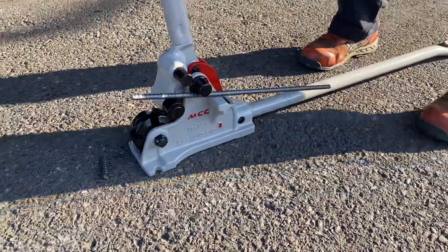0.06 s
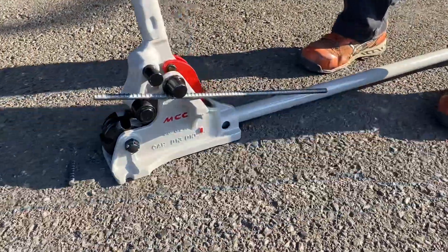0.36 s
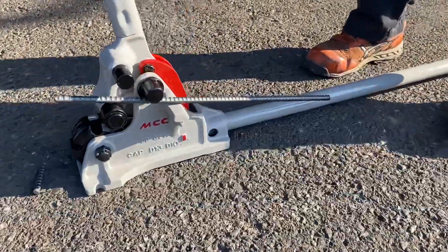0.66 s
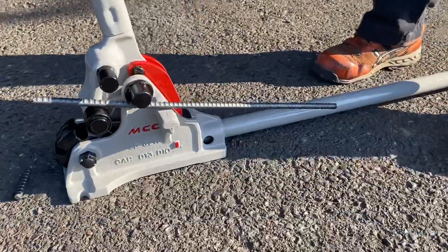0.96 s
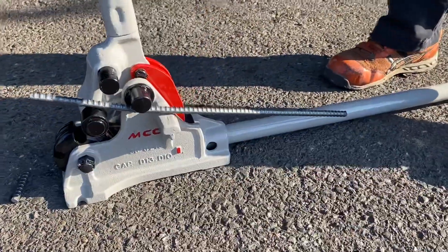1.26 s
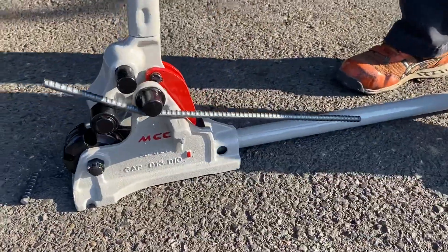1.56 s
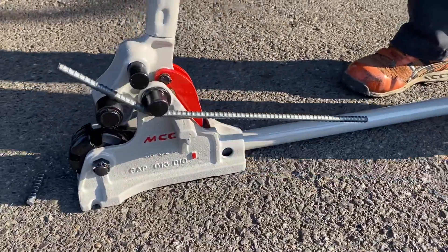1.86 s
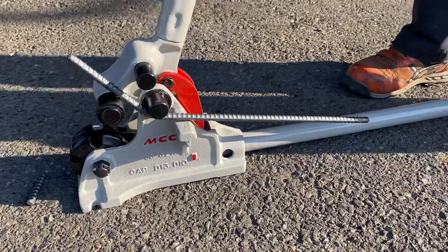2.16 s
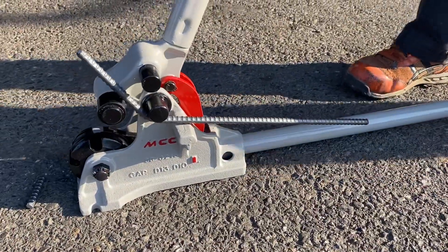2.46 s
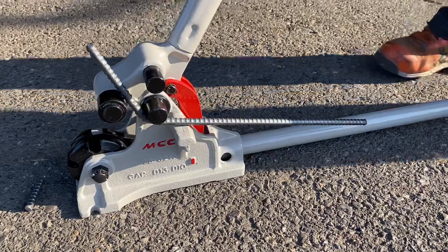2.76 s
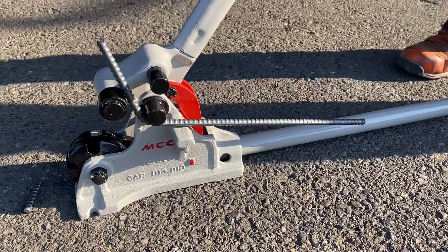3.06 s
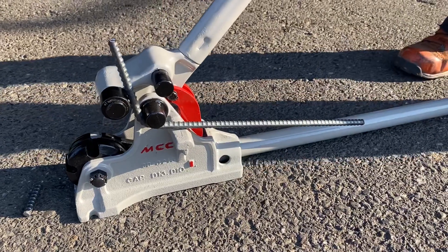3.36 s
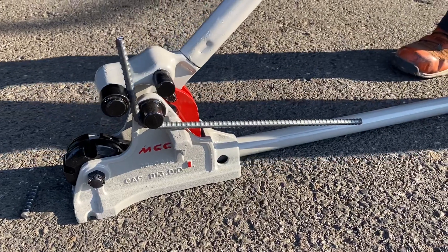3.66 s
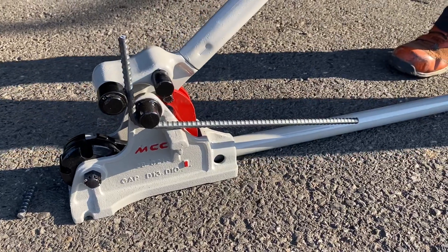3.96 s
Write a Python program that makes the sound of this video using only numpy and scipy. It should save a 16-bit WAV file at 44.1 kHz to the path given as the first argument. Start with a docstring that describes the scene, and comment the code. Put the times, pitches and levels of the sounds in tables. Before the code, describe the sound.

A steel rebar scrapes and knocks into a hand bender right at the start. At about 2 seconds it slips with a sharp double click and rings faintly, followed by two small clicks near 2.6 and 2.8 seconds. Grit ticks lightly on the asphalt. Wind rumbles on the microphone throughout, gusting around 1, 2.3 and 3.6 seconds, over faint hiss and steady distant traffic.

```python
"""An asphalt yard, outdoors, where a hand bender bends a steel rebar in front of a stereo microphone.
The bar scrapes and knocks into its seat, then slips under load with a sharp double click and rings on
faintly. Grit cracks under the tool and shoes; ground and walls give back a thin echo.
Wind buffets the microphone over a faint hiss and the steady wash of distant traffic."""
import sys
import numpy as np
from scipy import signal
from scipy.fft import rfft, irfft
from scipy.io import wavfile
from scipy.ndimage import uniform_filter1d

SR = 44100
rng = np.random.default_rng(int(sys.argv[2]) if len(sys.argv) > 2 else 0)


def file_out(sig):
    """Save sig as 16-bit WAV at sys.argv[1]."""
    # one column per channel
    cols = np.atleast_2d(sig).T
    # limit, then scale
    lim = np.clip(cols, -1, 1)
    pcm = np.round(lim * 32767).astype(np.int16)
    wavfile.write(sys.argv[1], SR, pcm)


N = 176400
TIME = np.arange(N) / SR
RING_RISE_S = 0.00093


def amp(db):
    """Decibels to gain."""
    return 10 ** (np.asarray(db) / 20)


def unit(x):
    """Scales to rms 1."""
    return x / np.sqrt(np.mean(x ** 2) + 1e-20)


def read(points, hz):
    """Reads a spectrum on a log-frequency axis."""
    f, value = np.transpose(points)
    return np.interp(np.log(hz + 1), np.log(f + 1), value)


def curve(points):
    """Reads a time curve at every sample."""
    return np.interp(TIME, *np.transpose(points))


def pan(db):
    """Channel gains that put left db above right."""
    return amp(np.array([[.5], [-.5]]) * db)


def add(mix, start_s, sound):
    """Mixes a sound in at a time."""
    part = mix[:, max(round(start_s * SR), 0):][:, :sound.shape[-1]]
    part += sound[..., :part.shape[1]]


def pulse(spectrum, size=1024):
    """A minimum-phase click of energy 1 with the given colour."""
    log_gain = np.log(amp(read(spectrum, abs(np.fft.fftfreq(size, 1 / SR)))))
    click = np.fft.ifft(np.exp(np.conj(signal.hilbert(log_gain)))).real[:size // 2]
    return click / np.linalg.norm(click)


def colour(x, spectrum):
    """Filters both channels with the given colour."""
    return signal.oaconvolve(x, pulse(spectrum)[None], axes=1)[:, :x.shape[1]]


def noise(spectrum, likeness, balance):
    """Stereo noise of rms 1; colour, left-right likeness and balance in dB each vary with Hz."""
    hz = np.fft.rfftfreq(N, 1 / SR)
    left, other = rfft(rng.standard_normal((2, N)))
    shared = np.clip(read(likeness, hz), -1, 1)
    right = shared * left + np.sqrt(1 - shared ** 2) * other
    return unit(irfft(np.array([left, right]) * amp(read(spectrum, hz)) * pan(read(balance, hz)), N))


def waver(db, seconds):
    """A gain that wanders at random."""
    size = int(seconds * SR)
    drift = uniform_filter1d(uniform_filter1d(rng.standard_normal(N), size), size // 2)
    return amp(db * unit(drift))


def impulses(size, per_s, spread_db):
    """Impulses at random times, a few stronger than the rest."""
    hits = rng.random(size) < per_s / SR
    return hits * amp(spread_db * np.minimum(rng.exponential(1, size), 4))


def moving_air(x, depth_db=2, band_hz=60, patch_s=.12):
    """Moving air makes narrow bands of distant sound swell and fade."""
    frame, hop = 2048, 512
    bands = signal.stft(x, nperseg=frame, noverlap=frame - hop)[2]
    patches = rng.standard_normal(bands.shape[1:])
    patches = uniform_filter1d(patches, round(band_hz * frame / SR), axis=0)
    patches = uniform_filter1d(patches, round(patch_s * SR / hop), axis=1)
    bands *= amp(depth_db * unit(patches))
    return unit(signal.istft(bands, nperseg=frame, noverlap=frame - hop)[1][:, :N])


def traffic():
    """Far-off traffic reaches the microphone as a wide, steady wash."""
    # Colour of the wash. Each row: frequency in Hz, relative density in dB.
    spectrum = [(25, -26), (65, -1.5), (250, -1.5), (400, -2), (700, -2), (950, -2), (1500, -10),
                (2200, -17.5), (3000, -29), (4500, -41), (7500, -48), (8600, -90.5), (9700, -92.5),
                (10600, -51), (13600, -51.5), (15000, -74.5)]
    # Stereo width. Each row: frequency in Hz, left-right correlation.
    likeness = [(60, 0.98), (250, 0.44), (500, 0.066), (900, -0.06), (1500, -0.29), (2500, 0.48),
                (5000, 0.41), (12000, 0.26)]
    # Lean to the right. Each row: frequency in Hz, left minus right in dB.
    balance = [(100, -1), (500, -4.5), (1000, -0.5), (3000, -0.5), (12000, -4)]
    # Slow drift. Each row: time in seconds, relative level in dB.
    level = [(0, -36), (.3, -36), (1.0, -36.5), (1.6, -36), (2.2, -36.5), (2.7, -36), (3.2, -36),
             (3.5, -37.5), (4, -38)]
    return moving_air(noise(spectrum, likeness, balance)) * amp(curve(level) + 5)


def hiss():
    """A faint, flickering hiss, strongest at the start."""
    # Colour of the hiss. Each row: frequency in Hz, relative density in dB.
    spectrum = [(1000, -23), (2500, 11.5), (4500, 10.5), (6000, 4.5), (7300, 3.5), (8000, 0), (8700, -37),
                (9600, -32.5), (10600, -0.5), (13600, -0.5), (14600, -22), (16000, -42)]
    # Its rise and fall. Each row: time in seconds, level in dB.
    level = [(0, -53.5), (.2, -53), (.33, -54.5), (.45, -62), (.62, -65), (.9, -65), (1.08, -61.5),
             (1.3, -60.5), (1.55, -58.5), (1.73, -57.5), (1.85, -62.5), (2.1, -63), (2.5, -61), (2.65, -59),
             (3.05, -64), (3.25, -60), (3.7, -61), (3.85, -57.5), (4, -62)]
    treble = noise(spectrum, likeness=[(3000, 0.21), (12000, 0.14)], balance=[(3000, -1), (12000, 0)])
    return treble * amp(curve(level)) * waver(db=1.1, seconds=0.015)


def eddies(spectrum, likeness, balance_db, steady_s):
    """Turbulence at the microphone's two ports, its strength held even over steady_s."""
    turbulence = noise(spectrum, [(100, likeness)], [(100, balance_db)])
    size = int(steady_s * SR)
    power = uniform_filter1d(uniform_filter1d((turbulence ** 2).mean(0), size), size)
    return turbulence / np.sqrt(power + 1e-9)


def wind():
    """Wind right on the microphone: a lumpy rumble and a higher flutter; short buffets swell both."""
    # Colours of the two layers. Each row: frequency in Hz, relative density in dB.
    rumble_spectrum = [(15, -43.5), (30, -20.5), (45, 0.5), (67, 6), (90, 2), (130, -6), (220, -25.5),
                       (500, -52.5), (3000, -110)]
    flutter_spectrum = [(50, -37.5), (120, 2), (190, -1), (260, 1), (335, -11), (500, -14), (700, -42),
                        (2000, -55), (8000, -100)]
    # The breeze in each layer. Each row: time in seconds, relative level in dB.
    rumble_level = [(0, -36.5), (.1, -38), (.2, -44), (.33, -31), (.6, -35), (.7, -35.5), (.92, -32.5),
                    (1.2, -31.5), (1.7, -34.5), (2.0, -34), (2.25, -29), (2.6, -26.5), (2.82, -33.5),
                    (2.95, -55), (3.15, -54), (3.42, -31), (3.69, -37.5), (3.82, -42.5), (3.92, -34.5),
                    (4, -43)]
    flutter_level = [(0, -35.5), (.3, -33.5), (.58, -34.5), (.68, -34), (.82, -29), (.9, -35.5), (1.0, -37),
                     (1.15, -39.5), (2.1, -40), (2.27, -28.5), (2.5, -30), (2.8, -41.5), (3.1, -41.5),
                     (3.33, -37), (3.5, -33), (3.75, -28), (3.87, -39.5), (4, -37)]
    # Single buffets. Each row: start and length in seconds, rumble and flutter peaks in relative dB.
    buffets = [(0.27, 0.042, -20, -40), (0.498, 0.037, -30, -31), (0.549, 0.017, -29, -21.5),
               (0.562, 0.048, -28, -36), (0.938, 0.08, -31, -25), (1.013, 0.038, -17.5, -27),
               (1.075, 0.039, -16, -45), (2.287, 0.048, -16, -23.5), (2.327, 0.06, -19.5, -14.5),
               (2.402, 0.025, -21, -22), (2.449, 0.027, -24, -20.5), (3.519, 0.042, -40, -20.5),
               (3.626, 0.064, -25, -23), (3.709, 0.026, -25, -26)]
    rumble_gain, flutter_gain = amp(curve(rumble_level)), amp(curve(flutter_level))
    flutter_gain *= flutter_gain / np.hypot(flutter_gain, amp(-38.5))  # lulls sink further
    for start, length, rumble_db, flutter_db in buffets:
        swell = np.sin(np.pi * np.clip((TIME - start) / length, 0, 1) ** 0.93)
        rumble_gain = np.hypot(rumble_gain, amp(rumble_db) * swell)
        flutter_gain = np.hypot(flutter_gain, amp(flutter_db) * swell)
    rumble = eddies(rumble_spectrum, likeness=0.71, balance_db=0, steady_s=0.034)
    lumps = waver(db=2.5, seconds=0.04)
    flutter = eddies(flutter_spectrum, likeness=0.65, balance_db=-0.5, steady_s=0.03)
    return amp(0.5) * rumble * rumble_gain * lumps + flutter * flutter_gain


def yard_echo(x, level_db=-19.5, t60=0.38, delay_s=0.0023):
    """A thin scattered tail from ground and walls."""
    # Colour of the echo. Each row: frequency in Hz, relative gain in dB.
    spectrum = [(500, -6), (2200, -4.5), (2700, 4.5), (3300, 0.5), (4500, 0), (7000, 2.5), (8500, -15),
                (11500, -5), (14000, -5)]
    t = TIME[:SR]
    tail = colour(rng.standard_normal((2, SR)) * amp(-60 * t / t60) * (t > delay_s), spectrum)
    return amp(level_db) * signal.fftconvolve(x, tail / np.linalg.norm(tail[0]), axes=1)[:, :N]


def fracture(t60, rise_s=.0013, crumble_db=-12.5, crumble_t60=0.041, cracks_per_s=2100):
    """One stone giving way: a burst of tiny cracks, then crumbling."""
    t = TIME[:SR // 10]
    decay = amp(-60 * t / t60) + amp(crumble_db - 60 * t / crumble_t60)
    envelope = (1 - np.exp(-t / rise_s)) * decay
    cracks = rng.random(len(t)) < cracks_per_s / SR
    strength = rng.standard_normal(len(t)) + .7 * rng.standard_normal((2, len(t)))
    burst = cracks * strength * envelope
    return burst / np.linalg.norm(burst[0])


def grit():
    """Small stones crack brightly under the tool's base and shoes, with finer ticks at random between."""
    # Cracking stones. Each row: start in seconds, relative level in dB, time to fall 60 dB in seconds.
    ticks = [(.1145, -34, .008), (.1572, -33, .007), (1.0647, -40, .02), (1.0874, -38, .008),
             (1.2315, -42, .012), (1.4105, -37.5, .016), (1.44, -37, .016), (1.444, -45, .012),
             (1.9432, -40, .008), (2.418, -40, .014), (2.482, -46, .012), (2.828, -49, .025),
             (2.852, -46, .025), (3.3825, -42, .012), (3.475, -38.5, .013), (3.605, -48, .02),
             (3.631, -47, .02)]
    # Colour of the grit. Each row: frequency in Hz, relative gain in dB.
    spectrum = [(1000, -31), (4000, -10.5), (5700, -1), (7500, -3), (9000, -11), (11000, 1), (13800, -3),
                (16000, -14.5)]
    out = np.zeros((2, N))
    for start, db, t60 in ticks:
        add(out, start, amp(db + 10) * fracture(t60))
    fine_ticks = amp(-56) * impulses(N, per_s=25, spread_db=2.5)
    out += signal.oaconvolve(fine_ticks[None], fracture(t60=.013), axes=1)[:, :N]
    return colour(out, spectrum)


def scrapes(fall_s=0.0079, treble_hz=9200):
    """Steel and soles rub: dense tiny slips under a stroke that bites, holds and lets go."""
    # Strokes. Each row: start and length in seconds, level and extra treble in dB, rise in seconds.
    strokes = [(0.109, 0.045, -40.5, -3, .005), (0.145, 0.045, -41, 0, .008), (1.126, .03, -56, 5, .01),
               (1.698, 0.042, -56, 3, 0.012), (1.895, 0.073, -49, 3, .045), (1.957, 0.025, -44.5, 0, .006),
               (2.816, 0.06, -53, -1, .008)]
    # Colour of the rubbing. Each row: frequency in Hz, relative gain in dB.
    spectrum = [(500, 7.5), (1500, -13.5), (1950, 8), (2250, 1.5), (2550, 6), (3300, 1), (3900, 1),
                (4450, 4), (5000, -0.5), (5330, 3.5), (6050, -8.5), (6650, 2.5), (7100, -3.5), (7850, 0),
                (9000, -25.5), (11000, -1.5), (13500, -11), (16000, -38)]
    t, out = TIME[:SR], np.zeros((2, N))
    highpass = signal.butter(4, treble_hz, "high", fs=SR)
    for start, length, db, treble_db, rise_s in strokes:
        grains = impulses(SR, per_s=9000, spread_db=1.5)
        rub = unit(grains * (rng.standard_normal(SR) + rng.standard_normal((2, SR))))
        rub += (amp(treble_db) - 1) * signal.filtfilt(*highpass, rub)
        envelope = np.clip(np.minimum(t / rise_s, (length - t) / fall_s), 0, 1)
        add(out, start, amp(db) * rub * envelope)
    return colour(out, spectrum) * pan(db=-0.5)


def free_end(partials=9, spread=.035):
    """The bar's free end shimmers without a clear note: its ribs split each mode into close partials."""
    # Faint, lasting modes. Each row: frequency in Hz, relative level in dB, 60 dB decay in seconds.
    modes = [(1896, -49, .85), (2390, -46, 0.92), (2770, -57.5, .6), (3120, -54, 1), (3320, -54.5, 0.97),
             (4300, -66, 0.41), (5100, -62, .6), (6360, -65, .6)]
    t, out = TIME[:SR], np.zeros((2, SR))
    for hz, db, t60 in modes:
        for offset, left_phase, right_phase in rng.random((partials, 3)):
            partial_hz = hz * (1 + spread * (2 * offset - 1))
            turns = partial_hz * t + np.array([[left_phase], [right_phase]])
            out += amp(db - 60 * t / t60) * np.sin(2 * np.pi * turns) / np.sqrt(partials)
    return amp(2) * out * (1 - np.exp(-t / RING_RISE_S))


def clamped_steel():
    """The clamped bar and jaws give a short, heavily damped ring."""
    # Damped modes. Each row: frequency in Hz, relative level in dB, 60 dB decay in seconds.
    modes = [(2290, -9.5, 0.0095), (2350, -24, 0.0025), (3170, -34, 0.017), (3375, -28.5, 0.014),
             (3800, -37, 0.011), (4610, -39, 0.018), (5650, -39, 0.014), (7200, -38, 0.014),
             (11360, -34, 0.011), (12000, -33, .007)]
    t = TIME[:SR]
    ring = sum(amp(db - 60 * t / t60) * np.sin(2 * np.pi * hz * t) for hz, db, t60 in modes)
    return amp(10.5) * ring * (1 - np.exp(-t / RING_RISE_S)) * pan(db=2)


def slips():
    """Right of centre, the bar slips against the rollers; each slip cracks and sets the steel ringing."""
    # Slips. Each row: start in seconds, crack and ring in relative dB, the crack's left minus right
    # in dB, low-pass cutoff in Hz.
    events = [(.1190, -22, -38, -5, 15000), (0.137, -19, -28, -2, 9000), (0.14, -17, -23, -2, 9000),
              (.1585, -19, -20, -2, 15000), (.1612, -17, -31, -6, 9000), (0.1761, -3.5, -27, -3, 5600),
              (0.179, -8, -17, -4, 4800), (0.1835, -15, -19, -2, 5500), (.1864, -10.5, -17, -9, 11500),
              (1.968, -19.5, -19, -12, 7500), (1.977, -3, -5.5, -3, 16900), (1.9841, -2, -1.5, -7.5, 11800),
              (2.5872, -17.5, -19, -7, 6800), (2.8298, -23.5, -29, -5, 7000)]
    # Colour of the crack. Each row: frequency in Hz, relative level in dB.
    spectrum = [(300, -32), (1500, -22.5), (2250, 7.5), (2780, 0.5), (3200, 1.5), (3550, 0), (3900, -1),
                (5400, -2.5), (6700, -9.5), (7500, -10.5), (8600, -21), (9800, -18.5), (11400, -15),
                (13000, -20), (16000, -37.5)]
    out = np.zeros((2, N))
    crack = amp(2) * pulse(spectrum, size=2 * SR)
    ring = clamped_steel() + free_end()
    for start, crack_db, ring_db, pan_db, cutoff_hz in events:
        hit = amp(crack_db) * pan(pan_db) * crack + amp(ring_db) * ring
        contact = signal.butter(4, cutoff_hz, fs=SR)
        add(out, start, signal.lfilter(*contact, hit))
    return out


def scene():
    """The bender and its echo in the yard, with traffic behind and wind on the microphone."""
    tool = slips() + scrapes() + grit()
    tool[0] = np.roll(tool[0], 1)  # reaches the left side one sample later
    return tool + yard_echo(tool) + traffic() + hiss() + wind()


def record(dry):
    """The microphone's notch in the treble, then the recorder's band limit."""
    notch_hz, width_hz, depth_db, limit_hz = 9140, 360, -13.5, 15800
    hz = np.fft.rfftfreq(N, 1 / SR)
    notch = amp(depth_db * np.exp(-((hz - notch_hz) / width_hz) ** 2))
    heard = irfft(rfft(dry) * notch, N)
    lowpass = signal.firwin(511, limit_hz, window=("kaiser", 9), fs=SR)
    return signal.oaconvolve(heard, lowpass[None], "same")


dry = scene()
out = record(dry)
file_out(out)
```